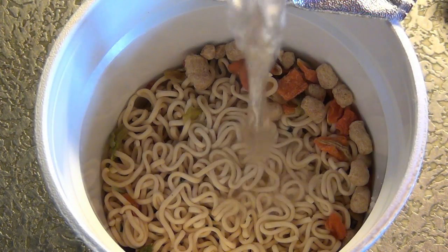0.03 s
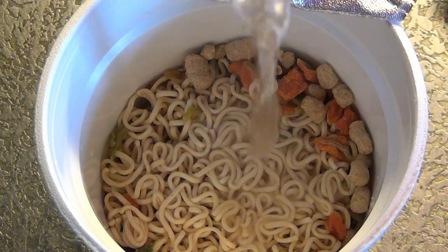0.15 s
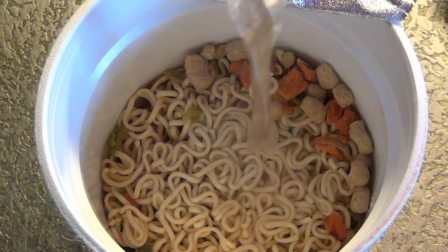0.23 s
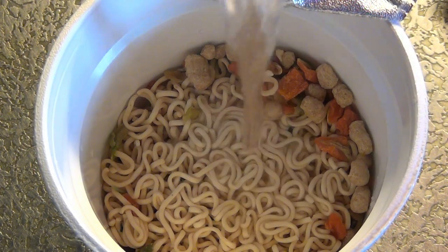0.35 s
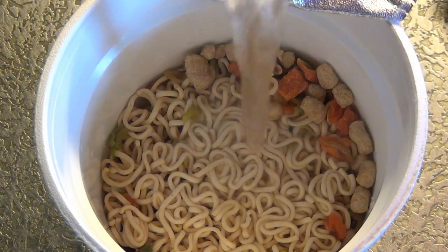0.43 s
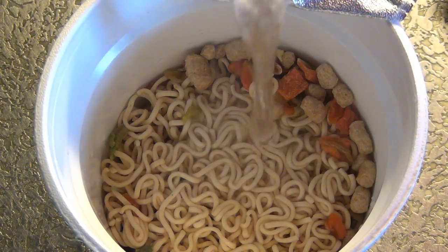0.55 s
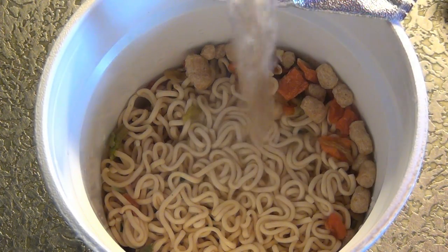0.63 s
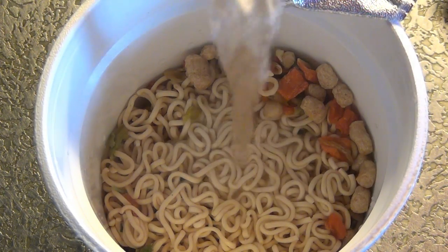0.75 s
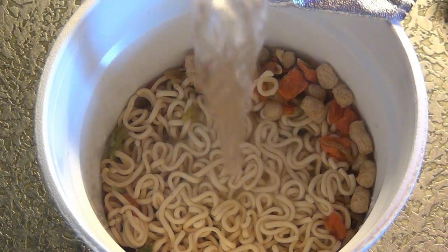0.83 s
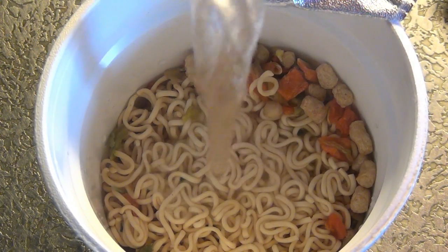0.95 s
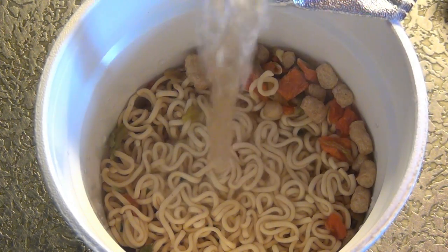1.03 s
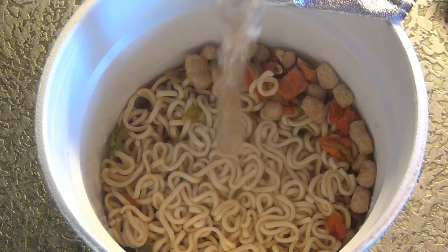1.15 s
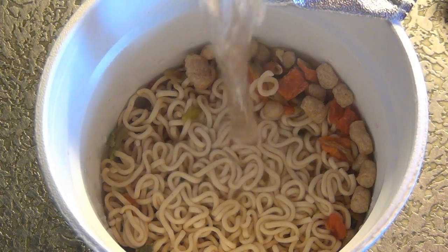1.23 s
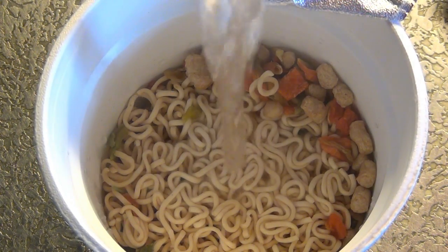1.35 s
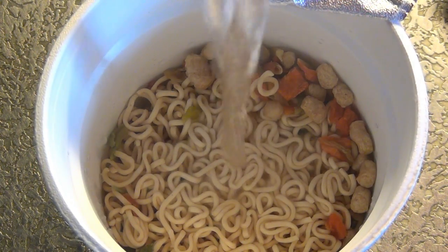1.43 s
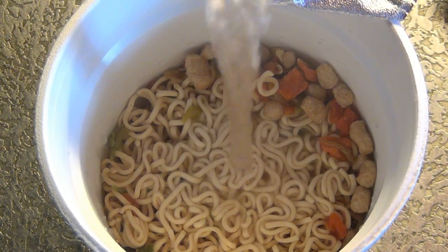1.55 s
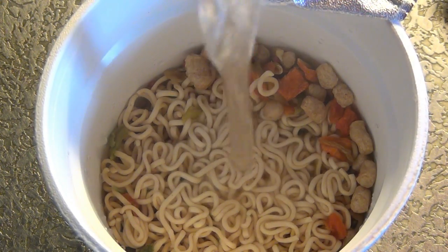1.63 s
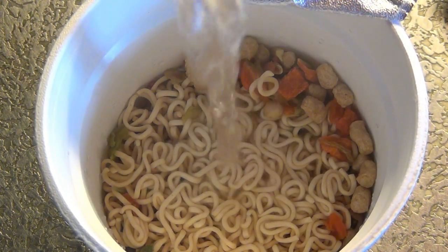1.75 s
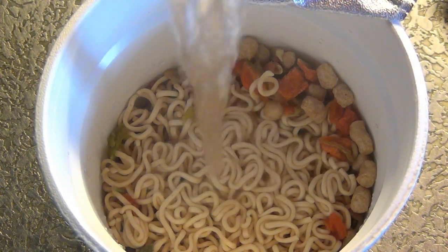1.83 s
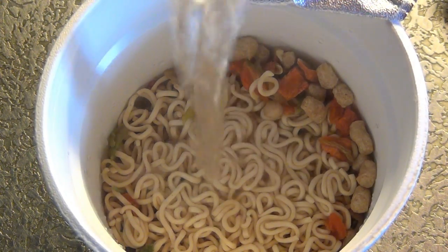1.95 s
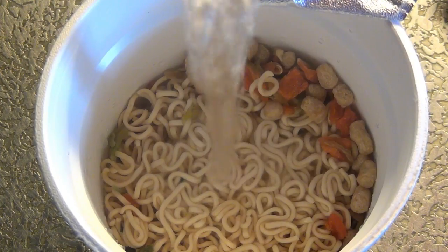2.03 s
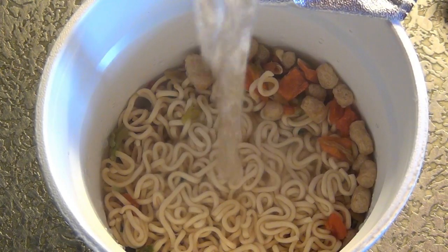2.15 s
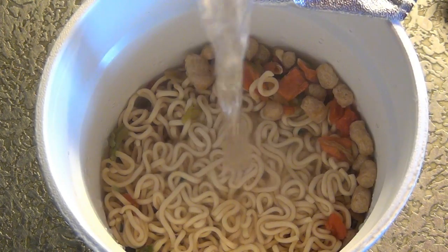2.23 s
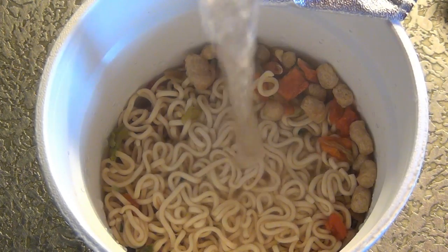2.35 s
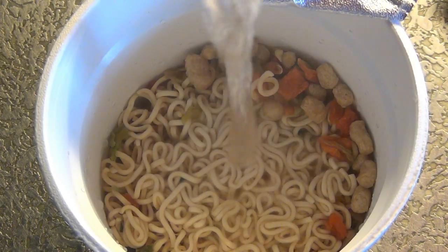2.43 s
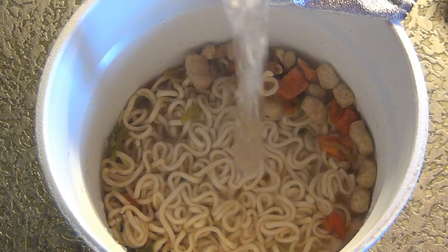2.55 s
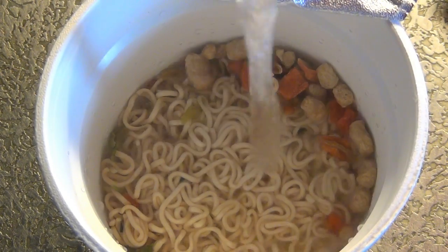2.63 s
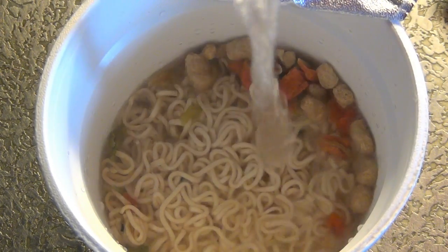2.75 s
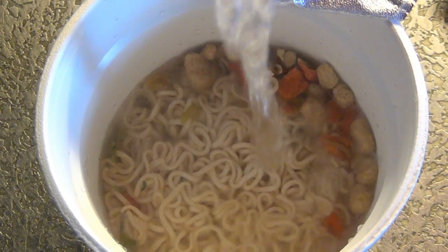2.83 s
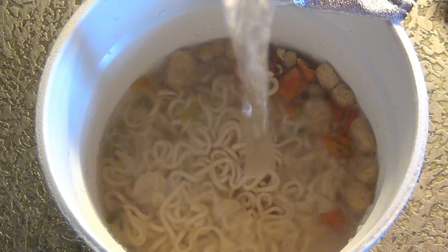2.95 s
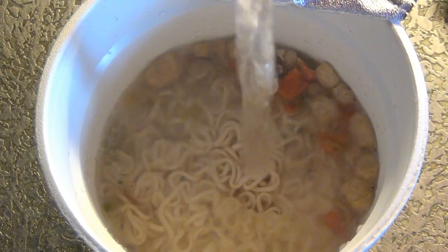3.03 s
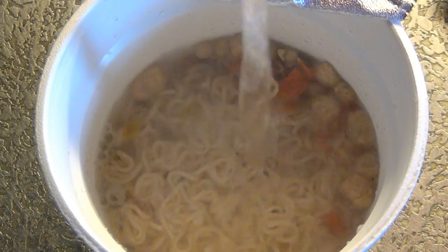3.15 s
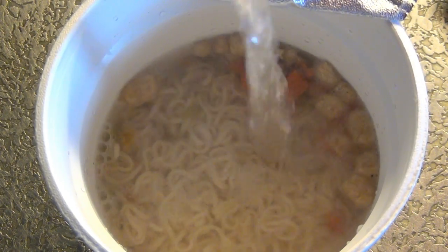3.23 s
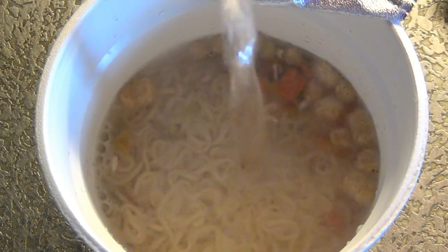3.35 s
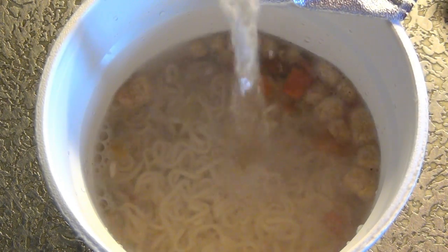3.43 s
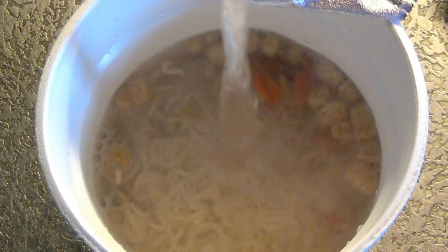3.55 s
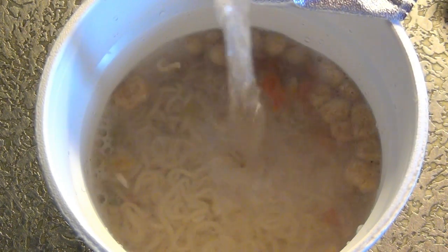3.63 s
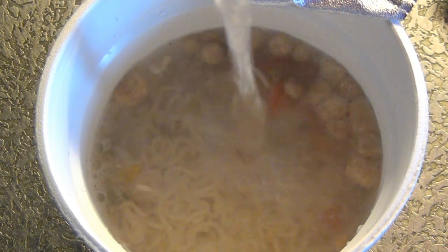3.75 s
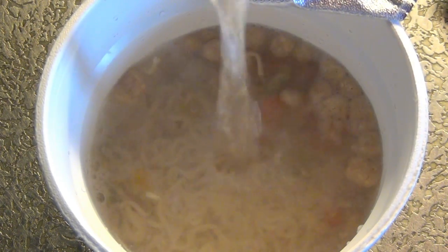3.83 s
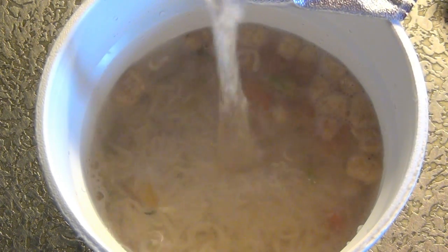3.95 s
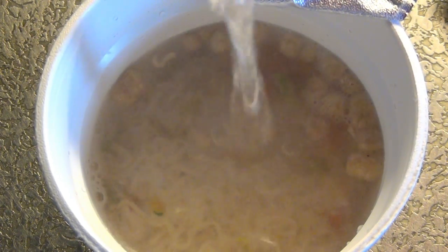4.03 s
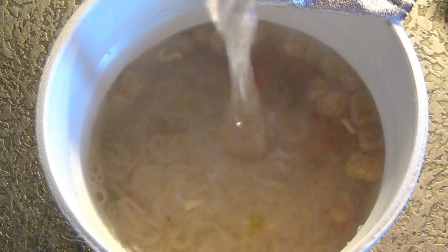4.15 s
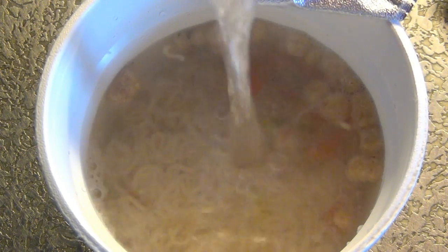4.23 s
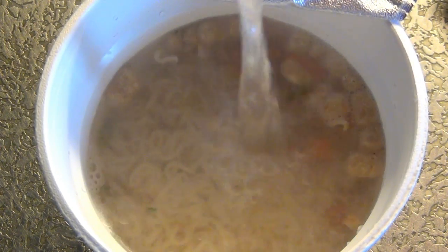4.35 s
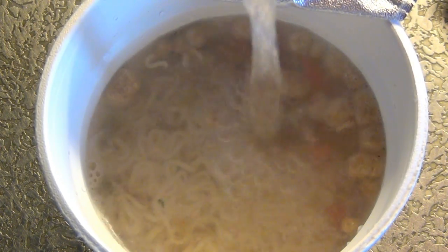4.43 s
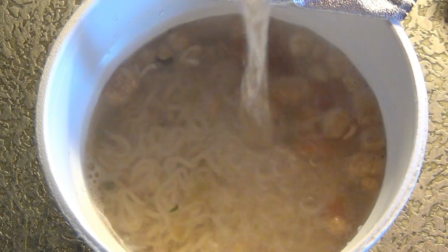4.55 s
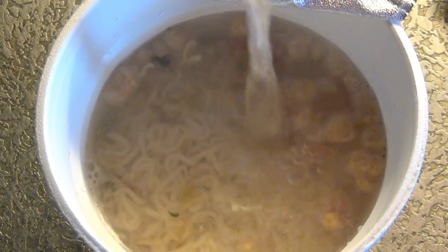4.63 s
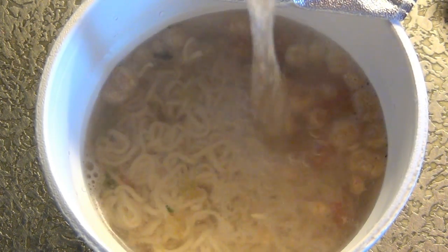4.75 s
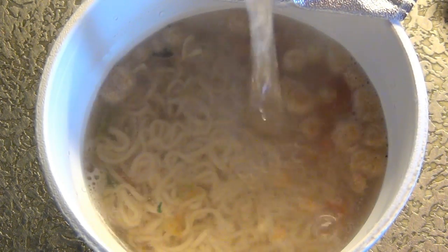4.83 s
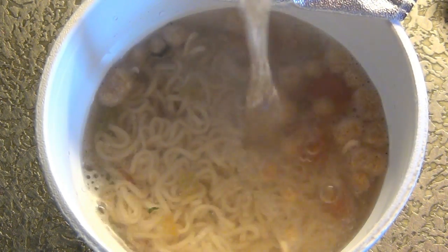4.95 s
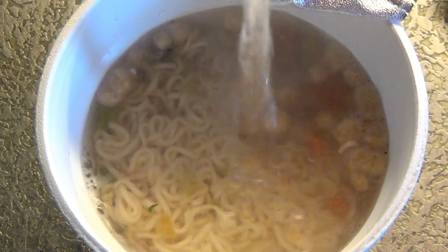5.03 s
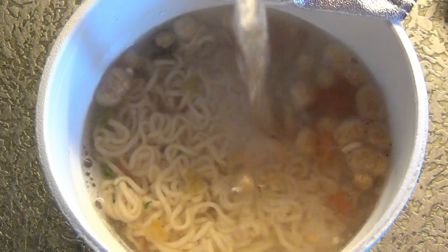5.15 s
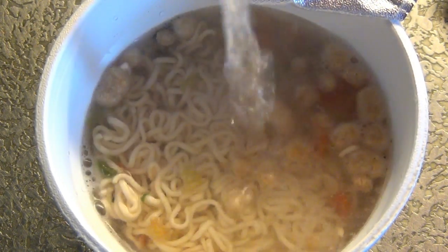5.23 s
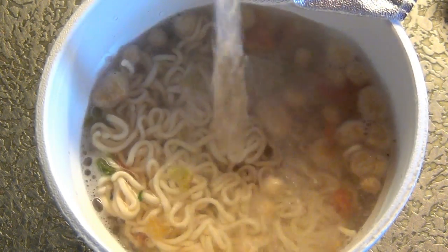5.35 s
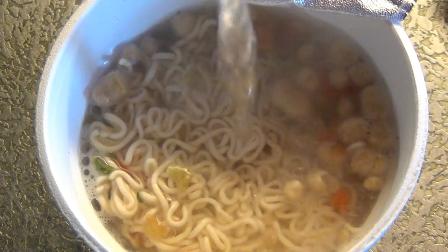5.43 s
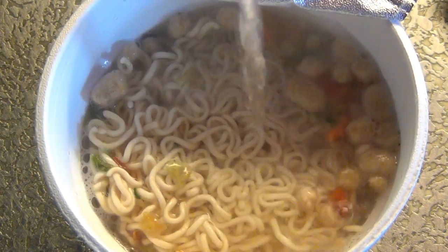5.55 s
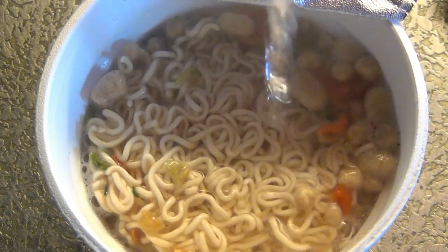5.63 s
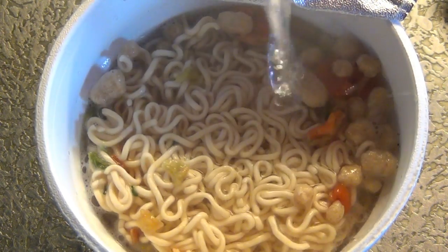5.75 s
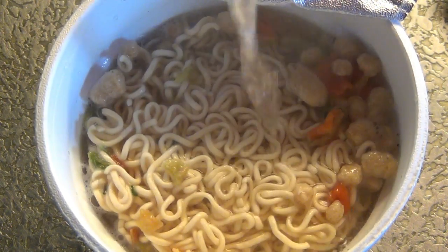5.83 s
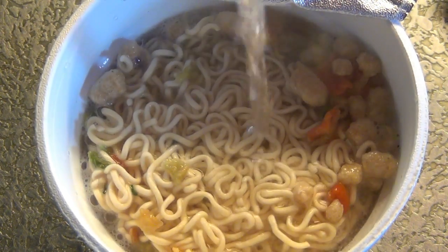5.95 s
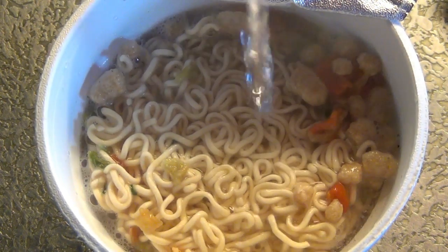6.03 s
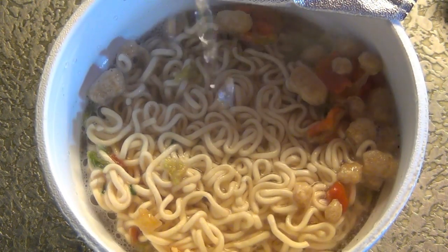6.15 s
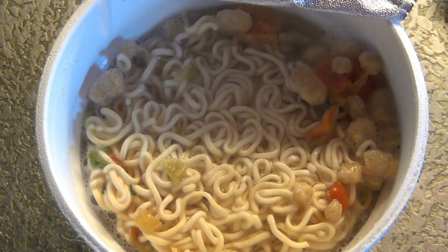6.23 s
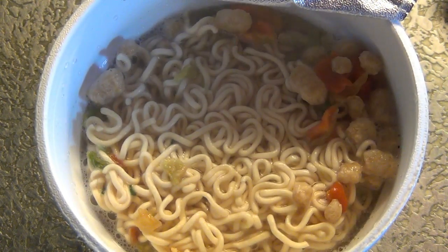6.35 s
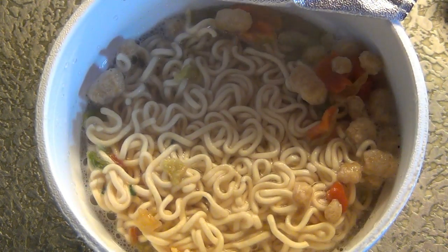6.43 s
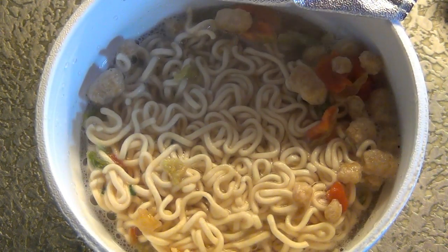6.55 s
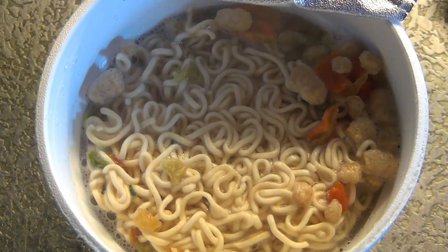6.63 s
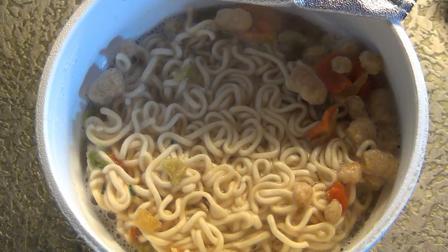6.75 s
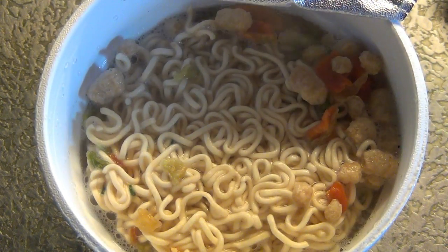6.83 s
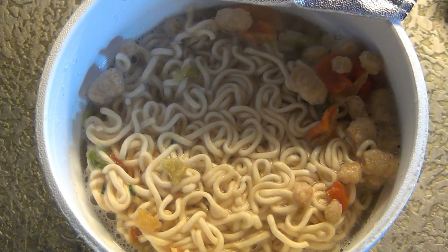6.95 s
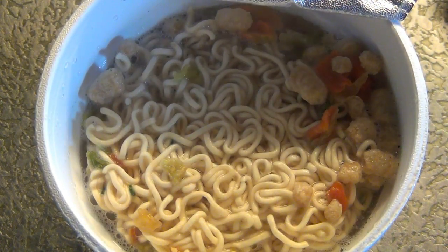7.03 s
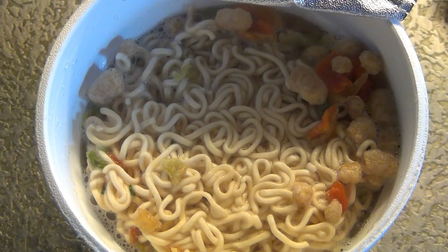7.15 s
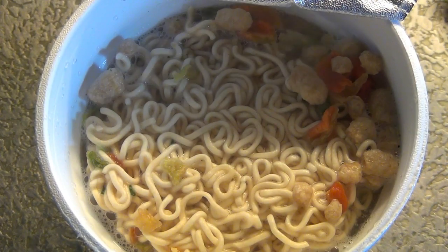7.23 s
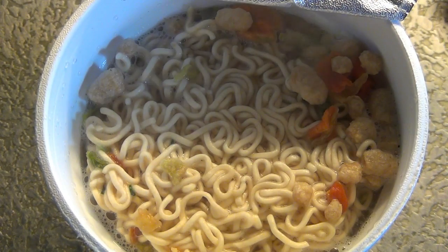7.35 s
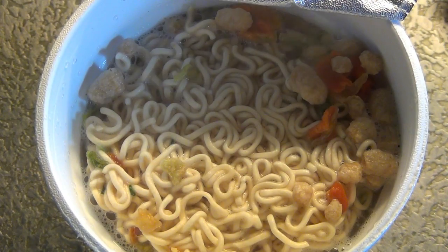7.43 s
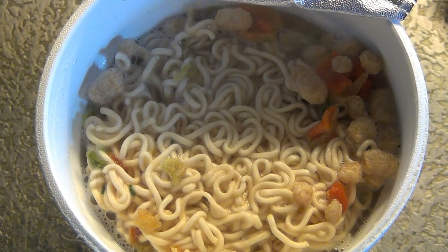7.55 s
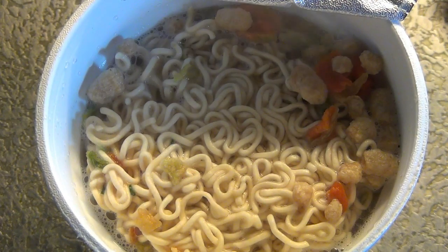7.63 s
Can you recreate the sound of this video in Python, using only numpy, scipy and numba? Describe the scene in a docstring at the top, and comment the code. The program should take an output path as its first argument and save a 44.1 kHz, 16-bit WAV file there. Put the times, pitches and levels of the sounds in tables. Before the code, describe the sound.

Very close, a thin stream of hot water falls into a cup of dry noodles, first a crisp, sizzling patter with light trickling. About three seconds in, water rises over the noodles and the sound turns wetter, with quick gurgles and hollow plops. The stream thins to a few separate splats just after six seconds, leaving tiny fading crackles over a low kitchen hum.

```python
"""A thin stream of boiling water is poured into a noodle cup, close to the microphone in a quiet kitchen.
It first patters and sizzles on dry noodles; once the water covers them it drags air under and plops.
Bubbles ring as decaying sines, splats are bursts of coloured noise, and the cup adds its resonances.
The stream breaks into last drops, and the soaking noodles crackle on over the low hum of the room."""
import sys
import numpy as np
from scipy import signal
from scipy.fft import rfft, irfft
from scipy.io import wavfile
from scipy.ndimage import uniform_filter1d
from numba import njit

SR = 44100
rng = np.random.default_rng(int(sys.argv[2]) if len(sys.argv) > 2 else 0)


def waveform_to_disk(signal):
    """Save audio, clipped to [-1, 1], as 16-bit WAV at the path in sys.argv[1]."""
    frames = np.transpose(np.atleast_2d(signal))
    scaled = np.clip(frames, -1, 1) * 32767
    samples = np.round(scaled).astype(np.int16)
    wavfile.write(sys.argv[1], SR, samples)


N = 339119
TIME = np.arange(N) / SR
SPLASH_TIME = np.arange(1024) / SR  # the time within one drop
TOP_HZ = 16000  # highest grain pitch, and the edge of the recorder's low-pass

# largest air pockets closing under the stream and the last drops, levels ahead of the cup's resonance:
# start_s, plop_db, slap_db, spray_db
POCKETS = [(0.418, -43.5, -35, -32.5), (3.127, -32, -35, -31), (3.235, -30, -49, -47),
           (3.285, -31, -43, -31), (3.306, -23.5, -37, -35), (3.377, -32, -44, -41),
           (3.487, -31, -29.5, -30.5), (3.516, -32.5, -34, -22.5), (3.572, -26.5, -35.5, -44),
           (3.771, -28.5, -47, -48), (3.821, -31, -32, -27), (3.876, -26, -34, -29.5),
           (3.973, -29.5, -37, -35), (4.09, -29, -32, -33), (4.152, -29, -36, -31),
           (4.172, -29.5, -42, -38), (4.188, -30.5, -46, -29.5), (4.274, -29.5, -42, -46),
           (4.334, -23.5, -30, -33), (4.347, -25, -37, -35), (4.413, -24.5, -31.5, -43),
           (4.539, -29.5, -25.5, -49), (4.586, -28.5, -26, -35), (4.637, -42, -25.5, -30),
           (4.708, -35, -39, -40), (4.81, -34.5, -35, -23), (4.907, -33, -33, -27),
           (4.952, -26.5, -34.5, -29.5), (4.982, -28, -41, -33), (5.066, -28, -57, -56),
           (5.098, -38, -46, -31), (5.114, -34, -31, -26.5), (5.205, -30.5, -38, -28.5),
           (5.271, -28, -42, -34), (5.722, -29, -27.5, -25.5), (5.766, -40, -29.5, -21),
           (5.807, -38, -31, -24.5), (6.099, -39.5, -31.5, -29)]
# share of the noodles under water: time_s, share (0-1)
FLOODING = [(2.9, 0.01), (3.35, 0.31), (3.85, 0.26), (4.15, 0.71)]
# spectrum of drops striking dry noodles: frequency_hz, level_db
DRY_COLOUR = [(1600, -9), (2200, -14), (3100, -6), (5000, 1), (6400, -11.5), (8500, -24.5)]
# spectrum of drops striking water: frequency_hz, level_db
WET_COLOUR = [(550, -14.5), (1600, -2), (2400, -1), (3100, 1.5), (3900, -6.5), (5800, -2.5), (6400, -12),
              (8500, -35)]
# spectrum of the fine spray: frequency_hz, level_db
SPRAY_COLOUR = [(5000, -30), (6500, -10.5), (7400, -0.5), (8000, -2), (9100, 1), (11800, 2), (13000, -2.5),
                (15000, -9), (17000, -32)]


def stream():
    """Impact noise and bubble ringing both grow with the force of the jet, the bubbling more slowly."""
    # how hard the stream strikes as the kettle is tipped and righted: time_s, force_db
    pour = [(0, -13.5), (0.15, -9), (0.3, -12), (0.45, -4), (0.8, -5.5), (1, -8.5), (1.3, -2), (1.55, 1.5),
            (1.8, -3), (2.25, 0.5), (2.6, -4.5), (3.3, 0), (4.5, 0), (4.75, -3.5), (5.4, 1), (5.6, -5),
            (6.1, -5.5), (6.7, -28)]
    # levels at a force of 0 dB; the trickle gains so many dB per dB of force
    trickle_db, patter_db, spray_db, trickle_slope = -56, -46.5, -40.5, 0.7
    drowned_db = -3  # the trickle dies down as the noodles go under water, so far if all are covered
    gurgle_db = -40  # at the deepest plunge
    plunge_patter_db = 6.5  # gain of the patter at the deepest plunge, if all noodles are covered
    force_db, flooded = curve(pour), np.clip(curve(FLOODING), 0, 1)
    depth, stirred = plunge(), wake()
    # impacts are heard both as patter and as spray
    pool = pool_share(flooded)
    # noodles break the stream up evenly, open water spits
    spread_db = 4.5 * (1 - pool) + 7 * pool
    impacts = grains(rate=480, hz=9300, octaves=2.8, cycles=3.0, spread_db=spread_db,
                     scatter_s=.004, count=3)
    trickle_gain = undb(trickle_db + trickle_slope * force_db + drowned_db * flooded)
    bubbling_gain = np.hypot(trickle_gain, undb(gurgle_db) * depth)
    patter_gain = undb(patter_db + force_db + plunge_patter_db * depth * flooded)
    # the wake adds to both in power
    water = bubbling(flooded, depth) * np.hypot(bubbling_gain, stirred)
    water += patter(impacts, flooded, depth) * np.hypot(patter_gain, stirred)
    return water + spray(impacts) * undb(spray_db + force_db)


def bubbling(flooded, depth):
    """Bubble resonance: a trickle between the noodles gives way to gurgling as a pool forms."""
    # air gaps between the noodles shrink as they fill: time_s, resonance_hz
    hollows = [(.6, 620), (1.7, 990), (3, 1270)]
    # spectrum of the large bubbles: frequency_hz, level_db
    gurgle_colour = [(600, -11.5), (850, -23), (1050, -6.5), (1600, 0.5), (1950, -11.5), (3200, -22)]
    pool = pool_share(flooded)
    trickle = unit(grains(rate=1200, hz=curve(hollows), octaves=0.39, cycles=9.6, spread_db=4.5))
    large_bubbles = grains(rate=240, hz=pocket_hz(depth), octaves=1.68, cycles=5.8, spread_db=4.5,
                           scatter_s=.008, count=2)
    gurgle = unit(colour(large_bubbles, gurgle_colour))
    return steady((0.57 + pool) * gurgle + (1 - pool) * trickle)


def patter(impacts, flooded, depth):
    """Impact noise with small ringing bubbles; the surface struck, dry or wet, sets the spectrum."""
    wet, dry = np.sqrt(flooded), np.sqrt(1 - flooded)
    beads = grains(rate=500, hz=3700, octaves=1.6, cycles=6, spread_db=4, scatter_s=.004, count=3)
    blips = grains(rate=57, hz=2980, octaves=0.76, cycles=11.4, spread_db=4.0)
    on_noodles = unit(colour(impacts, DRY_COLOUR)) + unit(colour(beads, DRY_COLOUR))
    on_water = unit(colour(impacts, WET_COLOUR)) + unit(colour(beads, WET_COLOUR))
    # a deep plunge drives the longer-ringing blips under the surface
    under_surface = undb(4.5) * wet * depth * unit(blips)
    return steady(dry * on_noodles + wet * on_water + under_surface)


def spray(impacts):
    """Fine droplets sound high: the treble of the impacts, with a fizz of tiny resonant bubbles."""
    fizz = grains(rate=700, hz=10800, octaves=1.0, cycles=18, spread_db=4.5, scatter_s=.003, count=3)
    return steady(unit(colour(impacts, SPRAY_COLOUR)) + undb(-6.0) * unit(colour(fizz, SPRAY_COLOUR)))


def pool_share(flooded):
    """A pool under the stream is complete (1) once a quarter of the noodles are flooded."""
    return np.minimum(4 * flooded, 1)


def plunge():
    """Air entrainment: depth (0-1) of the jet digging into the pool, exponential rise and release."""
    start_s, attack_s, end_s, release_s = 3.13, 0.41, 4.9, 0.19
    attack = 1 - np.exp(-np.maximum(TIME - start_s, 0) / attack_s)
    return attack * np.exp(-np.maximum(TIME - end_s, 0) / release_s)


def pocket_hz(depth):
    """Larger bubbles resonate lower: a deeper plunge traps larger pockets, down to 0.31 octave lower."""
    return 1627 * 2 ** (-0.31 * depth)


def wake():
    """Exponential decay: gain of the small bubbles that every large pocket leaves behind."""
    level_db, decay_s = -15, 0.024  # level relative to the pocket's own slap
    kicks = np.zeros(N)
    for s, _, slap_db, _ in POCKETS:
        kicks[int(s * SR)] = undb(slap_db + level_db)
    return signal.lfilter([1], [1, -np.exp(-1 / (decay_s * SR))], kicks)


def drops():
    """Impact and resonance: a drop is a short splat; a plop adds the swings of a large trapped bubble."""
    # loudest single drops and bubbles bursting on noodles and water, levels ahead of the cup's resonance:
    # start_s, slap_db, spray_db
    ticks = [(0.679, -35.5, -47), (0.825, -36.5, -36.5), (0.88, -41, -36), (1.099, -40, -30),
             (1.113, -35.5, -36.5), (1.247, -39, -32.5), (1.465, -41, -33), (1.932, -38.5, -37),
             (2.67, -44, -32), (2.776, -34.5, -31), (2.85, -47, -25.5), (2.866, -60, -22.5),
             (2.98, -58, -28.5), (3.068, -33, -31), (3.185, -31, -26.5), (3.252, -35.5, -31.5),
             (3.406, -48, -28), (3.452, -34.5, -23.5), (3.468, -44, -29), (3.503, -32, -32),
             (3.716, -39.5, -26.5), (3.831, -24, -28), (3.862, -41, -27.5), (3.939, -49, -22),
             (4.058, -27, -44), (4.074, -41, -25), (4.5, -35, -29), (4.656, -36.5, -26.5),
             (5.143, -33, -26.5), (5.242, -36, -27.5), (5.289, -46, -27), (5.695, -31.5, -29),
             (5.706, -39, -35), (5.746, -35, -36), (5.792, -32.5, -25), (5.96, -49, -27),
             (6.053, -37.5, -31), (6.075, -35, -25.5), (6.11, -53, -29.5), (6.175, -45, -34.5),
             (6.447, -61, -50), (6.706, -46, -36), (6.882, -51, -47.5)]
    scatter_octaves = 0.11  # spread of the pocket pitches
    out = np.zeros(N)
    flooded, depth = curve(FLOODING), plunge()
    for s, slap_db, spray_db in ticks:
        add(out, s, splat(flooded[int(s * SR)], slap_db, spray_db))
    for s, plop_db, slap_db, spray_db in POCKETS:
        i = int(s * SR)
        hz = pocket_hz(depth[i]) * 2 ** (scatter_octaves * rng.standard_normal())
        add(out, s, at_level(swing(hz), plop_db) + splat(flooded[i], slap_db, spray_db))
    return out


def splat(flooded, slap_db, spray_db):
    """Impact noise: a slap with a small bubble of chance size, and a shorter, finer spray."""
    # bare noodles give a brighter slap and smaller bubbles than open water
    dry = 1 - flooded
    tone = DRY_COLOUR if dry > .5 else WET_COLOUR
    slap = at_level(colour(burst(decay_s=0.001, scatter=0.26), tone), slap_db)
    bubble = at_level(swing(2200 * 2 ** (rng.random() + .5 * dry)), slap_db - 6.0)
    fine = at_level(colour(burst(decay_s=0.00068, scatter=0.05), SPRAY_COLOUR), spray_db)
    return slap + bubble + fine


def burst(decay_s, scatter):
    """Transient noise: contact builds quickly, then the water scatters with a slower decay."""
    t = SPLASH_TIME
    decay = np.exp(-t / decay_s) + scatter * np.exp(-t / 0.003)
    return rng.standard_normal(len(t)) * (1 - np.exp(-t / .0001)) * decay


def swing(hz):
    """Damped bubble resonance: an air pocket closes and swings a few times, rising in pitch."""
    t = SPLASH_TIME
    envelope = (1 - np.exp(-t / 0.00057)) * np.exp(-t / 0.00095)
    return np.sin(2 * np.pi * hz * t * (1 + 10 * t)) * envelope


def soaking():
    """Bubble bursting: tiny bubbles snap as flooded noodles take up water, and fade after the pour."""
    snap_db, fizz_db = -58, -54  # if all noodles were flooded
    fade_start_s, fade_db_per_s = 6.67, 5
    snaps = grains(rate=900, hz=6950, octaves=1.77, cycles=2.5, spread_db=2.5, scatter_s=.004, count=3)
    crackle = undb(snap_db) * steady(colour(snaps, WET_COLOUR))
    crackle += undb(fizz_db) * steady(colour(snaps, SPRAY_COLOUR))
    fade = undb(-fade_db_per_s * np.maximum(TIME - fade_start_s, 0))
    return crackle * curve(FLOODING) * fade


def cup(x):
    """Modal resonance: the cup and the air in it ring on briefly after every blow."""
    # resonances of the cup and its air: frequency_hz, width_hz, level_db
    modes = [(690, 41, 0), (1120, 160, 0), (1446, 117, 2), (1664, 42, -1.5), (3070, 86, -9),
             (4630, 160, -17.5)]
    ringing = sum(undb(db) * fixed_resonance(x, hz, width) for hz, width, db in modes)
    return x + ringing


def room(x, t60=0.3, wet_db=-13, size=16384):
    """Reverberation: faint reflections from counter and walls as decaying noise, partly unlike per side."""
    t = np.arange(size) / SR
    tails = rng.standard_normal((3, size)) * undb(-60 * t / t60) * (1 - np.exp(-t / 0.00093))
    tails /= np.sqrt(np.sum(tails ** 2, axis=1, keepdims=True))
    # one tail for each side, and a stronger one in common
    tails = tails[:2] * 0.3 + tails[2]
    return x + undb(wet_db) * np.array([signal.oaconvolve(x, tail)[:N] for tail in tails])


def kitchen():
    """Filtered noise: low ventilation hum, fan resonances and a thin hiss, with a faint high sine whine."""
    # spectrum of the room: frequency_hz, level_db
    hum_colour = [(25, -42), (60, -21.5), (95, -7), (150, -7), (195, 0), (270, -1), (340, -8), (550, -13),
                  (700, -12), (900, -18), (1600, -17.5), (6300, -26), (10500, -19.5), (14500, -27)]
    # the fan's rotor tone and duct resonance: frequency_hz, width_hz, level_db
    fan_modes = [(147.2, 4, -62), (193, 13, -57)]
    hum = unit(colour(rng.standard_normal(N), hum_colour))
    fan = np.zeros(N)
    for hz, width, db in fan_modes:
        fan += undb(db) * unit(fixed_resonance(rng.standard_normal(N), hz, width))
    diffuse = unit(colour(rng.standard_normal(N), [(25, -9.0), (400, 7), (2000, 0), (12000, -12)]))
    whine = np.sin(2 * np.pi * 15625 * TIME)
    # the diffuse noise is in opposite phase on the two sides
    opposed = undb(-61.5) * diffuse * np.array([[1], [-1]])
    return undb(-48.5) * hum + fan + undb(-72) * whine + opposed


def grains(rate, hz, octaves, cycles, spread_db, scatter_s=0, count=1):
    """Random superposition: a shower of parcels, many faint and few strong, each of one or more grains."""
    # the stream thickens, then thins to a dribble: time_s, share of the full rate (0-1)
    flow = [(0, 0.33), (1.3, 1), (5.3, 1), (5.95, 0.23)]
    draws = np.random.default_rng(rng.integers(2 ** 31)).random((int(rate * N / SR), 6, count))
    when, pitch, life, size, sign, luck = draws.transpose(1, 2, 0)
    # the first grain of a parcel is prompt, its fragments follow
    delay = when * (np.arange(count) > 0)[:, None]
    start = np.minimum(when[0] * N + delay * scatter_s * SR, N - 1).astype(np.int64)
    centre = np.broadcast_to(hz, N)[start] * 2 ** (octaves * (pitch - .5))
    centre = np.minimum(centre, TOP_HZ)
    strength = undb(-np.broadcast_to(spread_db, N)[start[0]] * np.log(size[0] + 0.015))
    # later fragments of a parcel are weaker
    strength = strength * np.exp(-delay) * np.sign(sign - .5)
    # a thinner stream brings fewer parcels
    strength *= luck[0] < curve(flow)[start[0]]
    lives = cycles * 2 ** (2 * life.ravel() - 1)
    return ring(start.ravel(), centre.ravel(), lives, strength.ravel())


@njit
def ring(start, hz, cycles, size):
    """Damped oscillation: each grain is a sine that dies by 50 dB in so many cycles and rises a little."""
    out = np.zeros(N)
    for k in range(len(start)):
        length = cycles[k] * SR / hz[k]
        for i in range(min(int(length), N - start[k])):
            age = i / length
            phase = 2 * np.pi * hz[k] * i / SR * (1 + .06 * age)
            out[start[k] + i] += size[k] * np.exp(-5.75 * age) * np.sin(phase)
    return out


@njit
def resonance(x, hz, width):
    """Second-order resonance: a band-pass with a moving centre, gain 1 at the peak."""
    y, band, low = np.empty(len(x)), 0., 0.
    for i in range(len(x)):
        g, k = np.tan(np.pi * hz[i] / SR), width / hz[i]
        v = (band + g * (x[i] + 1e-18 - low)) / (1 + g * (g + k))
        band, low, y[i] = 2 * v - band, low + 2 * g * v, k * v
    return y


def fixed_resonance(x, hz, width):
    """Second-order resonance at one frequency."""
    return resonance(x, np.full(N, float(hz)), float(width))


def colour(x, points, size=2048):
    """Minimum-phase filter through (Hz, dB) points, falling 12 dB per octave beyond both ends."""
    hz, db = np.transpose(points)
    octave, known = np.log2(np.maximum(np.fft.rfftfreq(size, 1 / SR), 10)), np.log2(hz)
    beyond = np.abs(octave - np.clip(octave, known[0], known[-1]))
    gain_db = np.interp(octave, known, db) - 12 * beyond
    # folding the cepstrum makes the response causal
    cepstrum = irfft(np.log(undb(gain_db)))
    cepstrum[1:size // 2] *= 2
    cepstrum[size // 2 + 1:] = 0
    return signal.oaconvolve(x, irfft(np.exp(rfft(cepstrum))))[:len(x)]


def undb(db):
    """Logarithmic level: decibels to amplitude gain."""
    return 10 ** (np.asarray(db) / 20)


def curve(table):
    """Linear interpolation in time of a (seconds, value) table."""
    s, value = np.transpose(table)
    return np.interp(TIME, s, value)


def unit(x):
    """Normalization of power: scale to rms 1."""
    return x / np.sqrt(np.mean(x ** 2))


def steady(x, size=7000):
    """Running normalization: even out a shower to rms 1 over about a sixth of a second."""
    return x / np.sqrt(uniform_filter1d(x ** 2, size) + 1e-12)


def at_level(x, db, size=176):
    """Short-time level: set the rms of the first 4 ms."""
    return x * undb(db) / np.sqrt(np.mean(x[:size] ** 2))


def add(track, s, sound):
    """Superposition: mix a sound into a track at a time."""
    start = max(int(s * SR), 0)
    part = track[start:start + len(sound)]
    part += sound[:len(part)]


def wander(rate=90):
    """Random modulation: independent normal values, 90 a second, joined by straight lines."""
    s = np.arange(0, N / SR, 1 / rate)
    return np.interp(TIME, s, rng.standard_normal(len(s)))


def scene():
    """Interaural time difference: the cup is just left of centre, so treble reaches the left early."""
    # the commonest size of the finest bubbles sets a bright peak: time_s, peak_hz
    fine_peak = [(1.6, 11600), (2.8, 9900), (3.35, 11500), (3.8, 10500), (4.15, 12100), (4.4, 8200),
                 (5.3, 9700), (6.2, 9100)]
    water = cup_input = stream() + drops() + soaking()
    water = cup(cup_input + undb(-6.0) * resonance(cup_input, curve(fine_peak), 2000.0))
    # the slope advances the left and delays the right; its wandering places each splash a little elsewhere
    side = 0.018 * water + (0.19 + 0.078 * wander()) * np.gradient(water)
    return room(water) + side * np.array([[1], [-1]]) + kitchen()


def record(dry):
    """Band limiting: the recorder cuts the top with a steep low-pass."""
    return signal.sosfilt(signal.ellip(8, .2, 70, TOP_HZ, fs=SR, output="sos"), dry)


dry = scene()
out = record(dry)
waveform_to_disk(out)
```